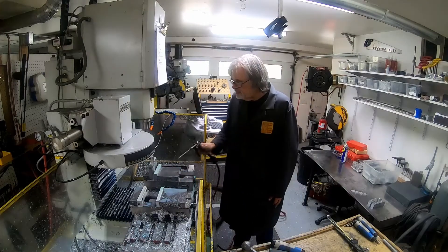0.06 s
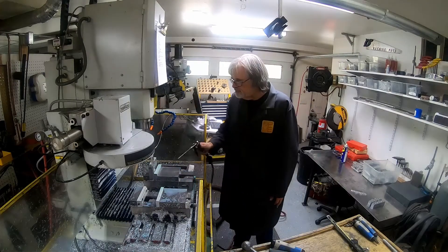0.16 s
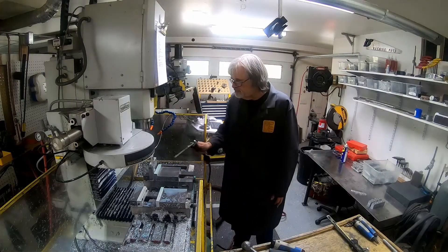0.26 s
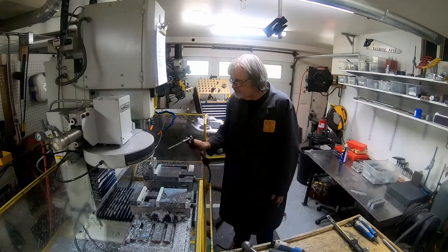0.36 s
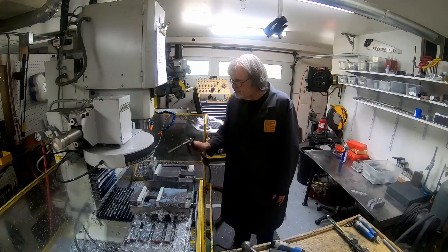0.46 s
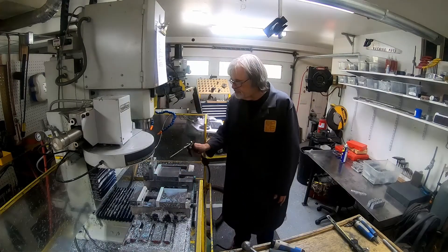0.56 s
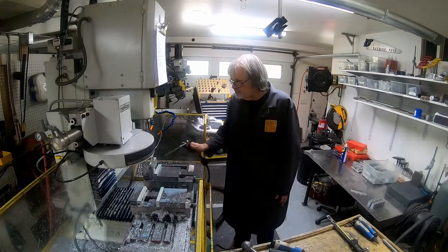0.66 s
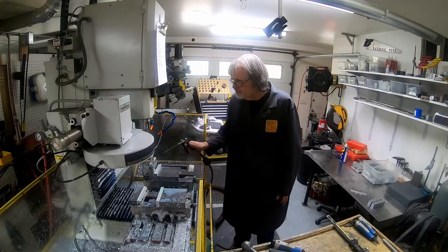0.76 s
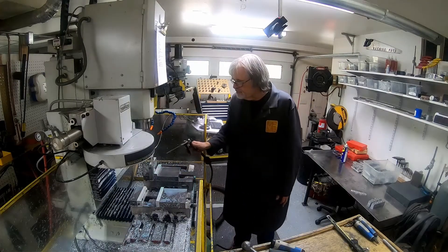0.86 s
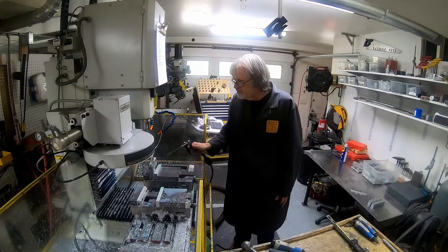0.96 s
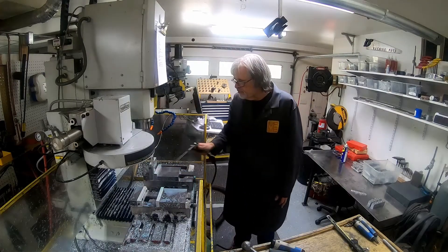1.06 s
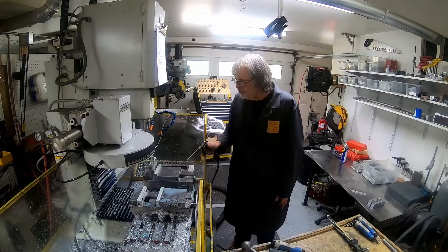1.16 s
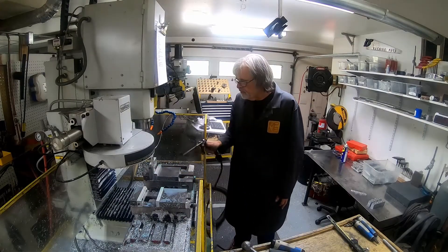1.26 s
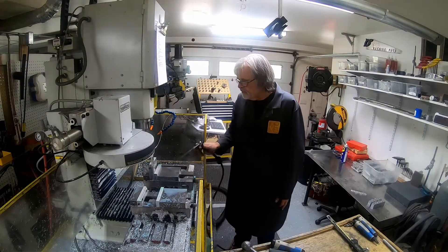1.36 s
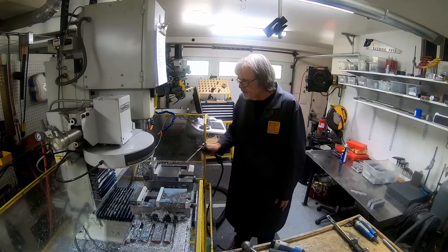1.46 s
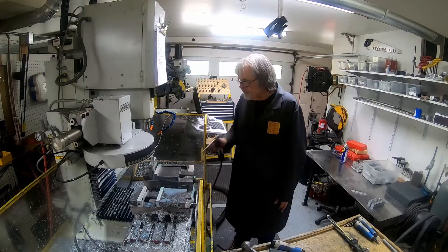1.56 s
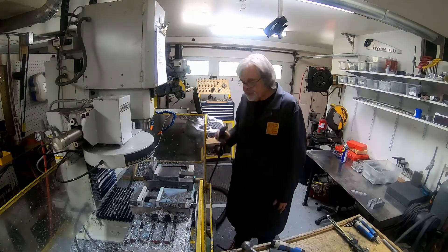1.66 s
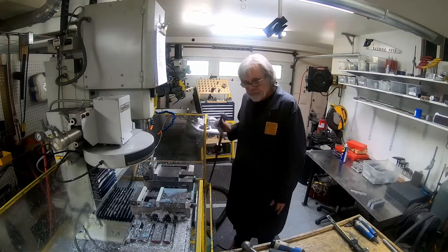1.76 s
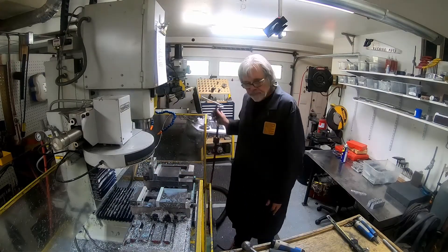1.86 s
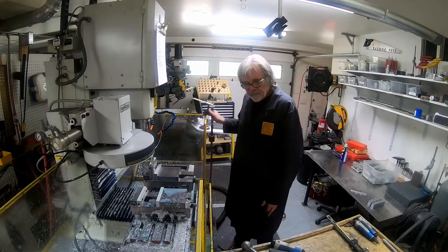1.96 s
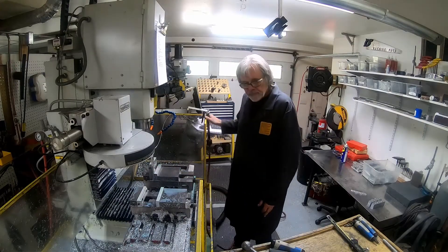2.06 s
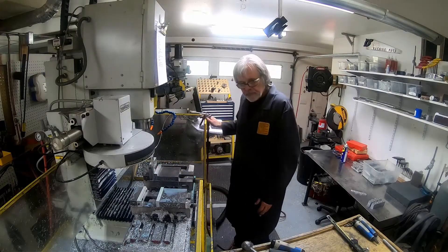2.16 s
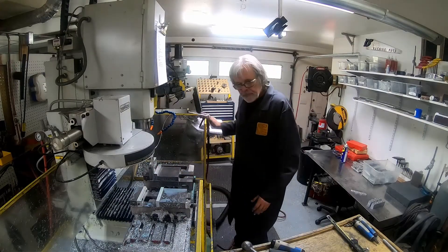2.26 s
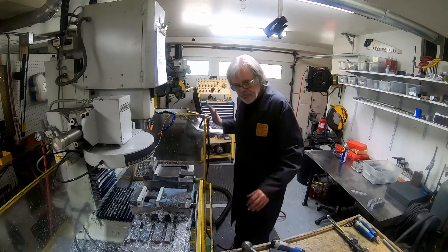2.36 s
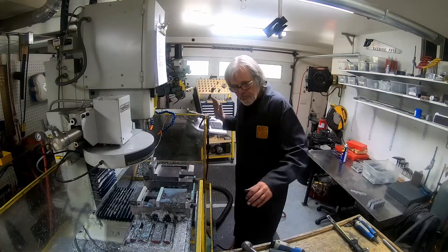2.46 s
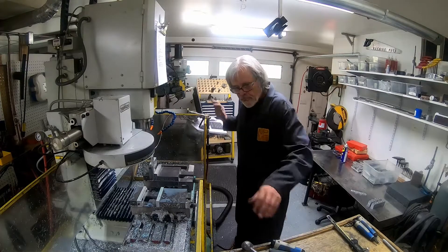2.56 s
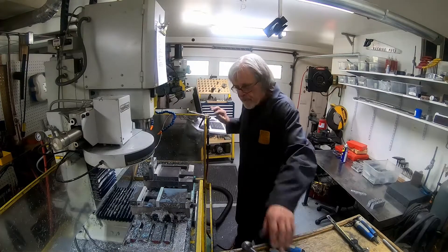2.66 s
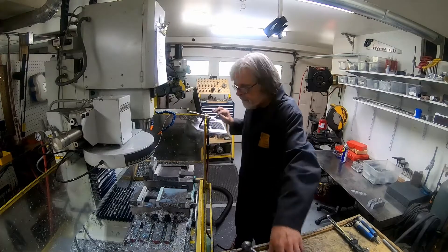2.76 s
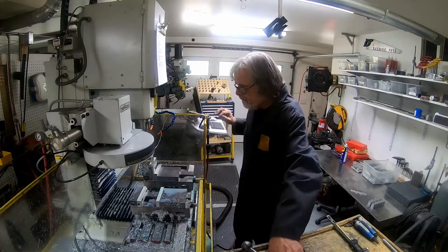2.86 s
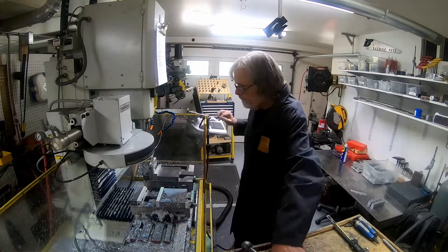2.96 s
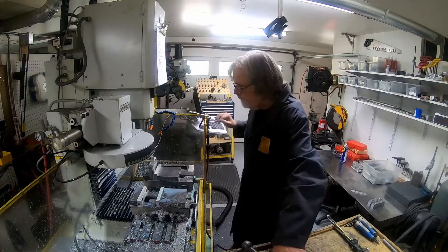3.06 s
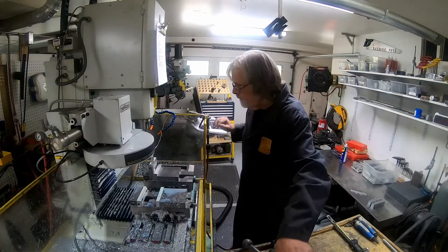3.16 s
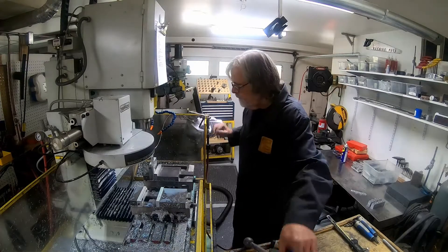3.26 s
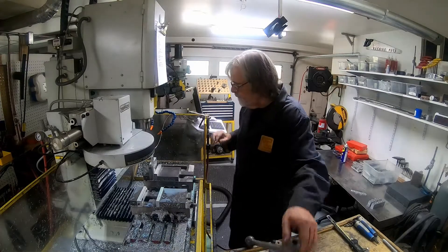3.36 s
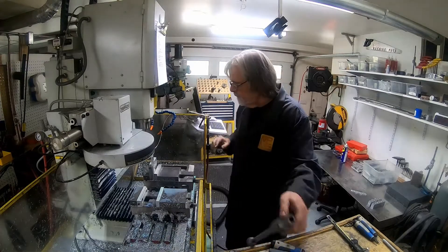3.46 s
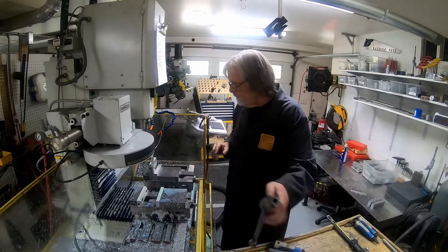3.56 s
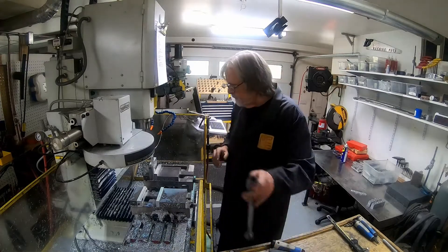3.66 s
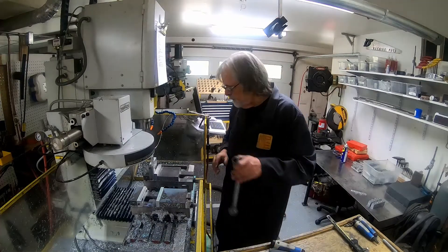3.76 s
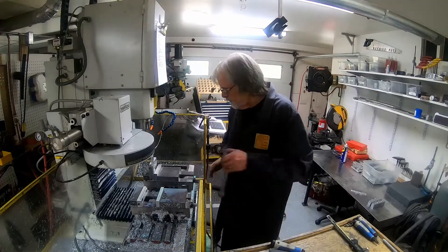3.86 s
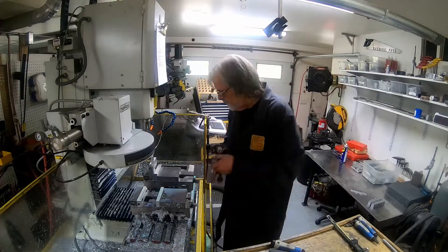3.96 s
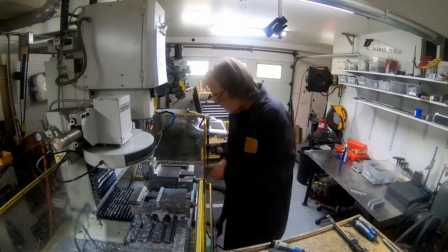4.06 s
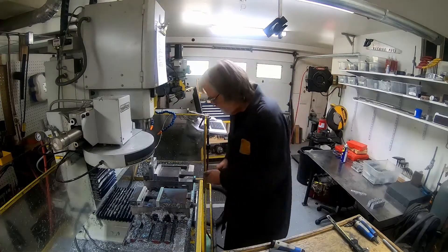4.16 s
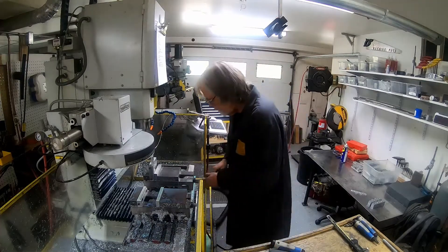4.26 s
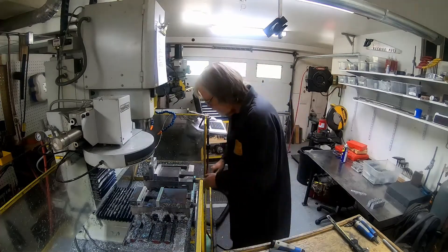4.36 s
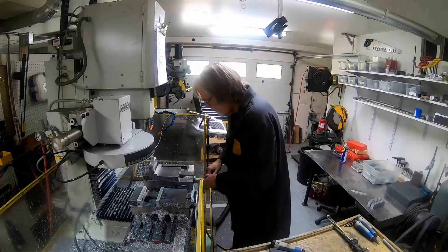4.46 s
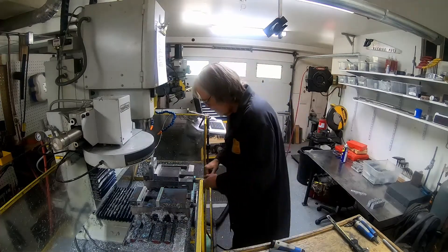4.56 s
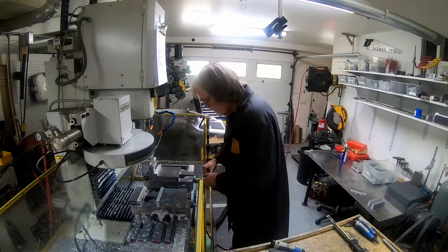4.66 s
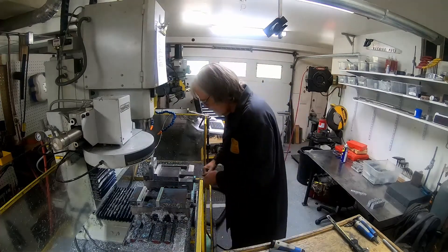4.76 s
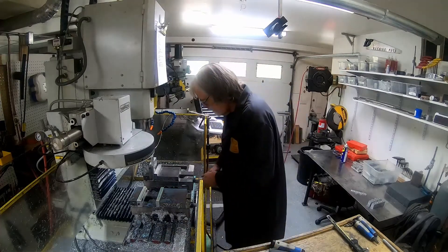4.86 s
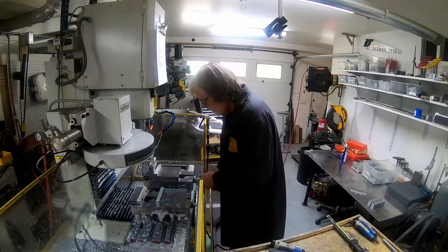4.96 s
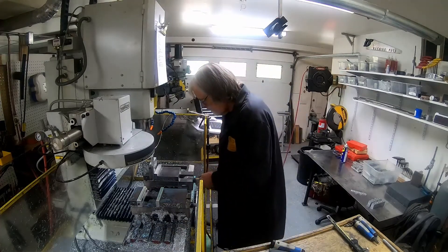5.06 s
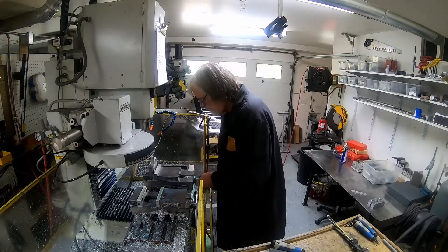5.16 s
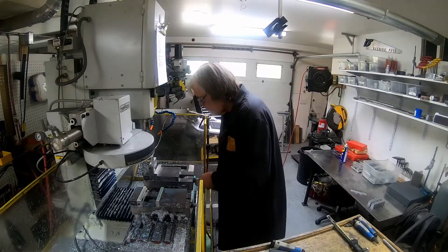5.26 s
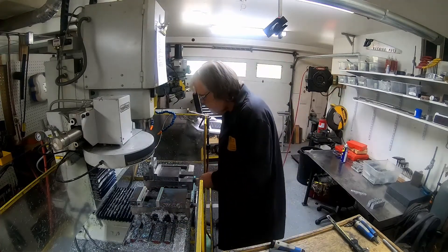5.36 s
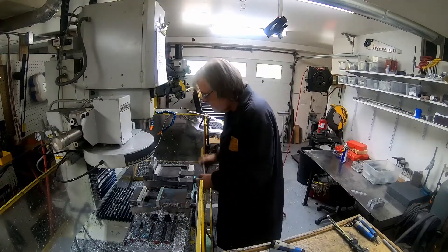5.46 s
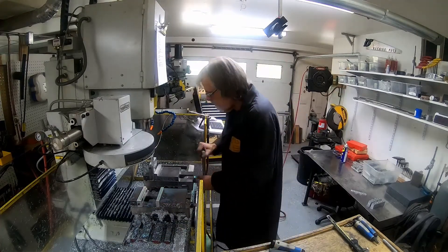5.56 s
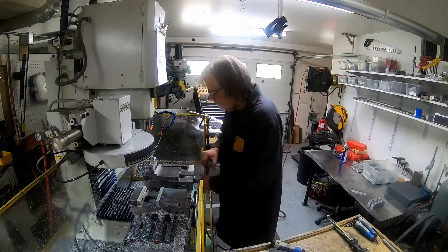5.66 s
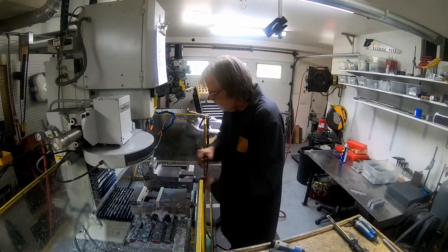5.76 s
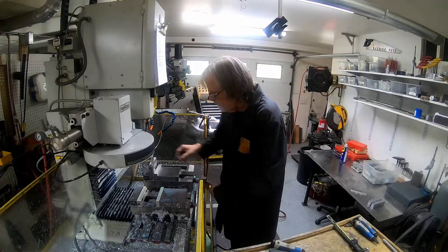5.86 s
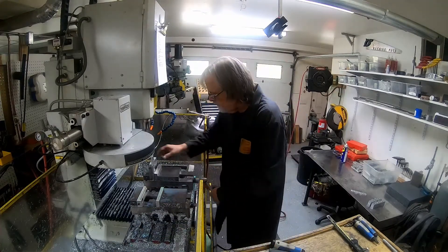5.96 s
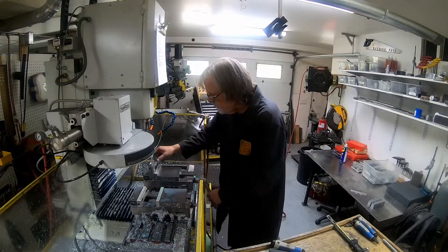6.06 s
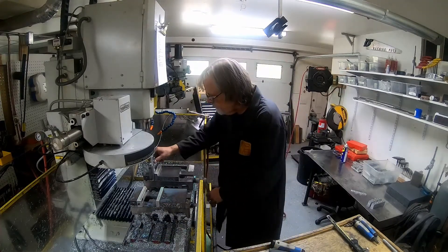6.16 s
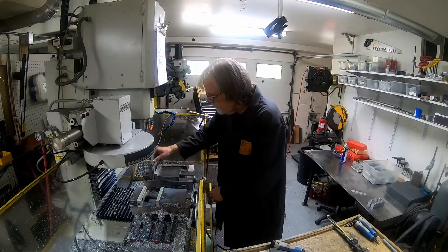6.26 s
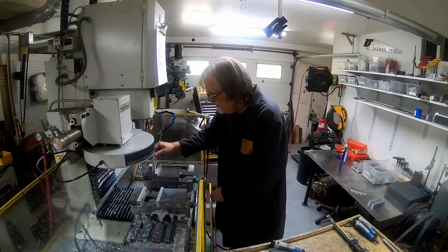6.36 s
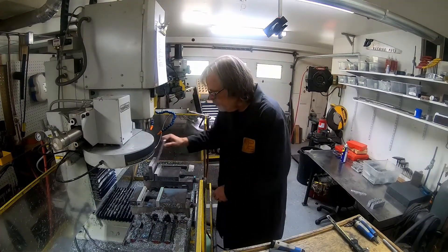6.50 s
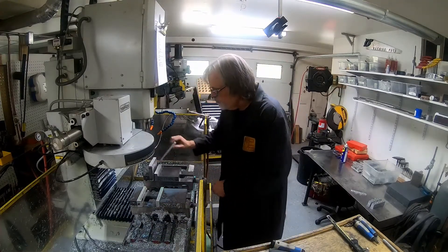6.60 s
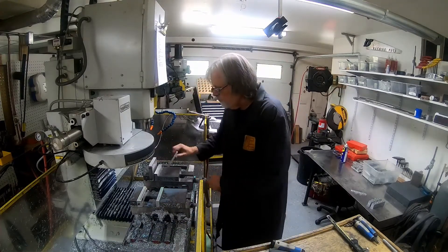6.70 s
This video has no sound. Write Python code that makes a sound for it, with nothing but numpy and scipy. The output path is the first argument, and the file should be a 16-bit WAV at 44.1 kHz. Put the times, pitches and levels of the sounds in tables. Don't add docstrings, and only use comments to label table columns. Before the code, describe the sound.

In an echoing garage workshop, an air gun spits five rapid bursts, is hung up with a thud, then wrench and vise parts click and scrape quietly.

```python
import sys
import numpy as np
from scipy import signal
from scipy.fft import rfft, irfft, next_fast_len
from scipy.io import wavfile
from scipy.ndimage import uniform_filter1d

SR = 44100
rng = np.random.default_rng(int(sys.argv[2]) if len(sys.argv) > 2 else 0)


def to_wav(sig):
    pcm = np.clip(np.atleast_2d(sig), -1, 1) * 32767
    pcm = np.round(pcm).astype(np.int16)
    wavfile.write(sys.argv[1], SR, pcm.T)


def invert_db(level):
    return 10 ** (np.asarray(level, dtype=float) / 20)


N = 296793

# (t/s, fine friction level/dB)
EFFORT = [(2.5, -83.5), (2.88, -84.5), (3.36, -79), (3.86, -84), (3.93, -89.5), (4.41, -85.5), (4.47, -69),
          (4.92, -61.5), (5.1, -62), (5.17, -73.5), (5.42, -65), (5.53, -59.5), (5.65, -71), (5.9, -86),
          (6.23, -72), (6.38, -67.5), (6.44, -56.5), (6.72, -86)]


def rms_one(x):
    return x / np.sqrt(np.mean(x ** 2) + 1e-20)


def played(tables, fade_s, out_s=None):
    t = np.arange(N) / SR
    s, *columns = np.transpose(np.concatenate(tables))
    gate = 0
    for rows in tables:
        start, end = rows[0][0], rows[-1][0]
        gate = gate + np.interp(t, [start - fade_s, start, end, end + (out_s or fade_s)], [0, 1, 1, 0])
    return [np.minimum(gate, 1)] + [np.interp(t, s, column) for column in columns]


def held(s, rise_s, length, fall_db_per_s, start_db=-18):
    t = np.arange(N) / SR - s
    rise = np.minimum(start_db * (1 - t / rise_s), 0)
    return np.where(t < 0, -200, rise - fall_db_per_s * np.maximum(t - length, 0))


def at_hz(points, hz):
    points = np.array(points)
    return np.interp(np.log(hz), np.log(points[:, 0]), points[:, 1])


def drift(rate):
    knots = rng.standard_normal(N // 64 + 400)
    r = np.exp(-128 * np.pi * rate / SR)
    slow = signal.lfilter([1], [1, -2 * r, r * r], knots)[398:]
    return np.interp(np.arange(N) / 64, np.arange(len(slow)), rms_one(slow))


def bands(low_hz, high_hz, count=2):
    edges = np.geomspace(low_hz, high_hz, int(count * np.log2(high_hz / low_hz)) + 2)
    return [(np.sqrt(a * b), signal.butter(2, [a, b], "band", fs=SR, output="sos"))
            for a, b in zip(edges, edges[1:])]


def coloured(spectrum, patchy_db, rate, grain_db=0.):
    grain = invert_db(grain_db * np.minimum(rng.exponential(1, N), 5))
    white = rng.standard_normal((2, N)) * grain
    together = drift(rate / 2)
    out = np.zeros(N)
    for k, (hz, sos) in enumerate(bands(spectrum[0][0], spectrum[-1][0])):
        flicker_db = patchy_db * (0.65 * together + drift(rate))
        out += invert_db(at_hz(spectrum, hz) + flicker_db) * signal.sosfilt(sos, white[k % 2])
    return rms_one(out)


def resonance(x, hz, width_hz):
    r = np.exp(-np.pi * width_hz / SR)
    poles = [1, -2 * r * np.cos(2 * np.pi * hz / SR), r * r]
    return signal.lfilter([(1 - r * r) / 2, 0, (r * r - 1) / 2], poles, x)


def twice(x, hz, width_hz):
    return resonance(resonance(x, hz, width_hz), hz, width_hz)


def moving_band(hz, width_hz, even=0.):
    lowpass = signal.butter(2, width_hz / 2, fs=SR, output="sos")
    slow = signal.sosfilt(lowpass, rng.standard_normal((2, len(hz))))
    slow = rms_one(slow) / (np.hypot(*rms_one(slow)) + .2) ** even
    phase = 2 * np.pi * np.cumsum(hz) / SR
    return rms_one(slow[0] * np.cos(phase) + slow[1] * np.sin(phase))


def add(track, s, sound):
    i = round(s * SR)
    track[i:i + len(sound)] += sound[:N - i]


def background():
    # (f/Hz, level/dB per Hz)
    hum = [(13, -27), (22, 2), (49, -3.5), (124, -4.5), (146, -17.5), (227, -7.5), (275, -19.5), (420, -19),
           (1500, -37.5), (1950, -68.5), (3300, -120)]
    # (f/Hz, level/dB per Hz)
    thin_air = [(530, -34.5), (900, -8), (1190, -10.5), (2630, -9.5), (13300, -18.5), (14500, -12),
                (16000, -25)]
    # (f/Hz, width/Hz, level/dB)
    whines = [(7987, 130, -93), (14450, 25, -100), (14879, 40, -104)]
    # (t/s, length/s, then the rise/dB of each whine)
    swells = [(2.2, .2, 5.5, 12, 3), (2.4, 0.22, 3.6, 2, 3), (5.05, .1, 6, 0, 0), (6.56, .2, 5, 7, 0),
              (2.9, .9, 2, 0, 0)]
    _, effort_db = played([EFFORT], fade_s=.01)
    rumble = invert_db(-58.5 + 0.22 * (effort_db + 70)) * coloured(hum, patchy_db=2.0, rate=17.0)
    whine = np.zeros(N)
    for k, (hz, width_hz, db) in enumerate(whines):
        level = invert_db(db)
        for s, length, *rises_db in swells:
            level = level + (invert_db(db + rises_db[k]) - invert_db(db)) * invert_db(held(s, .03, length, 100))
        whine += level * moving_band(np.full(N, hz), width_hz)
    return rumble + invert_db(-81.5) * coloured(thin_air, patchy_db=-1.0, rate=7.3) + whine


def blow_gun():
    # (pulled t/s, let go t/s, hiss level/dB, sag while held/dB, low roar level/dB)
    blasts = [(-.05, 0.063, -27.5, 0, 0), (0.275, 0.416, -28, -0.5, 0), (0.655, 0.813, -26, 3.5, -2),
              (1.034, 1.214, -27, 5, -1), (1.432, 1.593, -25, 3.5, 0.5)]
    # (t/s, level/dB)
    aim = [(0, 3), (.06, -1.5), (.3, -3), (.39, 0), (.48, -1.5), (.68, 1), (.72, -1), (.8, -2.5), (1.05, 2),
           (1.09, 1), (1.13, -1), (1.2, -2), (1.45, -3.5), (1.51, -5.5), (1.565, -0.5), (1.65, -1)]
    # (f/Hz, level/dB per Hz)
    hiss_colour = [(4200, -4.5), (5500, -1.5), (7000, -1.5), (8500, -3), (10200, -5), (12000, -8)]
    sizzle_colour = [(9300, -5), (10800, -1), (12500, 3), (14200, 0), (16600, -7)]
    roar_colour = [(15, -28.5), (25, -2.5), (198, -4), (525, -4.5), (678, -3.5), (757, -1), (961, -1.5),
                   (2000, -10), (2600, -44), (4400, -120)]
    rush_colour = [(1250, -3), (1600, -4.5), (2200, -0.5), (3000, 1), (4300, 2)]
    shut_s = .06
    t, flow, open_s, roar_db = np.arange(N) / SR, 0, 0, 0
    for opens, shuts, db, sag_db, low_db in blasts:
        length = shuts - opens
        since = np.clip(t - opens, 0, length)
        closed = np.interp(t, [shuts + shut_s, shuts + shut_s + .03], [1, 0])
        valve_db = held(opens, 0.03, length, 329.5, start_db=-21)
        flow = flow + closed * invert_db(db - sag_db * since / length + valve_db)
        open_s = np.where(t >= opens, since, open_s)
        roar_db = np.where(t >= opens, low_db, roar_db)
    _, aim_db = played([aim], fade_s=.01)
    hiss = coloured(hiss_colour, patchy_db=1.58, rate=19)
    sizzle = invert_db(-6.5 + 19.5 * open_s) * coloured(sizzle_colour, patchy_db=1.0, rate=49)
    roar = invert_db(-6 + roar_db + aim_db) * coloured(roar_colour, patchy_db=-2.5, rate=14)
    rush = invert_db(-2.5 + 1.7 * aim_db) * coloured(rush_colour, patchy_db=0.86, rate=20.0)
    return flow * invert_db(0.8 * drift(60)) * (hiss + sizzle + roar + rush)


def pockets():
    # (t/s, length/s, from f/Hz, to f/Hz, level/dB)
    passes = [(0, 0.038, 620, 653.2, -32.5), (0.018, 0.055, 2900, 3500, -26),
              (0.282, 0.04607, 6450, 5700, -32), (0.305, 0.1, 760, 900, -36),
              (0.376, 0.05, 3940, 3000, -37), (0.672, 0.03815, 7700, 6680, -26.5),
              (0.686, 0.097, 3580, 3700, -42), (1.065, 0.052, 4800, 4563, -26.5),
              (1.104, 0.03, 3700, 3400, -29), (1.126, .022, 2700, 2550, -29), (1.075, .03, 2400, 2200, -33),
              (1.45, .07, 11800, 12300, -35), (.07, .22, 3100, 3000, -51), (.07, .2, 560, 540, -54),
              (0, .07, 2200, 2300, -36), (.7, .1, 6200, 5900, -34), (1.65, .25, 560, 540, -61),
              (1.44, 0.07, 4300, 4100, -32.5), (1.542, 0.052, 2400, 2550, -27),
              (1.57, .045, 900, 600, -38.5), (1.036, .04, 1250, 1500, -38.5),
              (1.05, 0.087, 6200, 5800, -33), (.7, 0.083, 1150, 1200, -37), (0, .07, 6700, 8300, -34),
              (0, .065, 5900, 5700, -33), (.3, 0.09, 12500, 13000, -38), (.69, .1, 12800, 12500, -37),
              (1.46, .12, 8500, 8800, -34), (.28, .13, 7500, 7000, -36), (.755, 0.038, 4900, 5400, -36),
              (.75, .04, 3500, 3600, -36.5), (.33, .05, 6500, 5400, -35), (1.5, 0.069, 5700, 5000, -36),
              (0, 0.056, 197.6, 180, -38.5)]
    out = np.zeros(N)
    for s, length, from_hz, to_hz, db in passes:
        hz = np.linspace(from_hz, to_hz, round(length * SR))
        whistle = moving_band(hz, width_hz=0.21 * from_hz, even=.3)
        add(out, s, invert_db(db) * np.hanning(len(hz)) ** 0.45 * whistle)
    return out * invert_db(0.92 * drift(80))


def shop(x, tail_share):
    # (f/Hz, t60/s)
    room_t60 = [(60, 1.8), (250, 1.1), (1000, 1.13), (4000, 1.06), (9000, 0.69), (12500, 0.52),
                (15500, 0.36)]
    t = np.arange(SR * 3 // 2) / SR
    white = rng.standard_normal((2, len(t)))
    late_db = 70 * np.maximum(t - 0.28, 0)
    echo = np.zeros(len(t))
    for k, (hz, sos) in enumerate(bands(40, 17000, count=4)):
        decay_db = -60 * t / at_hz(room_t60, hz) / tail_share - min(hz / 2002, 1) * late_db
        echo += signal.sosfilt(sos, white[k % 2]) * invert_db(decay_db)
    echo = echo * (1 - np.exp(-t / 0.006))
    return signal.fftconvolve(x, echo / np.sqrt(np.sum(echo ** 2)))[:N]


def knocks():
    # (t/s, peak level/dB, f/Hz, burst/ms, brightness/dB)
    tool_knocks = [(1.925, -47, 493.5, 23, -10), (2.041, -60.5, 150.1, 26, -26.5),
                   (2.848, -58, 694.8, 30, -9), (2.863, -57, 650, 39, -4.5),
                   (2.917, -51, 420, 16.16, -20.5), (2.976, -52, 390, 9.8, -26.5),
                   (3.005, -43.5, 390, 16, -28), (3.029, -45.5, 348, 4.656, -17),
                   (3.008, -52, 1000, 14, -14), (2.179, -42, 700, 8, -22), (2.327, -40, 1700, 25, -12),
                   (4.447, -42.5, 407, 57, -10), (4.68, -39, 760, 14, -12), (4.697, -43, 790, 14, -8),
                   (4.938, -45, 305, 4.1, -20.5), (5.679, -49.5, 488, 25, -19), (5.833, -55, 255, 12, -26),
                   (6.496, -28, 845, 16.5, -10)]
    more_knocks = [(2.157, -49, 600, 8, -26), (2.213, -38, 600, 6, -20), (2.326, -33.5, 1390, 34.5, -32),
                   (2.356, -31, 343, 5.699, -35), (5.035, -33, 1130, 12.3, -1), (5.84, -55, 945, 9.3, -15),
                   (5.551, -43, 445, 8.3, -19.5), (6.4973, -18, 710, 0.91, -4), (6.499, -26, 587, 6, -30),
                   (6.501, -41, 128.4, 22, -41)]
    out, t = np.zeros(N), np.arange(SR // 5) / SR
    for s, db, hz, burst_ms, bright_db in tool_knocks + more_knocks:
        decay = np.exp(-1000 * t / max(burst_ms, 1))
        burst = rng.standard_normal(len(t)) * decay * (1 - np.exp(-t / 0.0037))
        burst[40] += 5.0
        body = twice(burst, hz, 1.08 * hz)
        edge = twice(burst, 2200, 2400)
        knock = body / np.abs(body).max() + invert_db(bright_db) * edge / np.abs(edge).max()
        add(out, s, invert_db(db) * knock)
    return signal.sosfilt(signal.butter(2, 6000, fs=SR, output="sos"), out)


def pushes():
    # (t/s, peak level/dB, f/Hz, t60/s)
    panel_pushes = [(2.179, -28.5, 448, 0.055), (2.196, -35, 328, 0.072), (2.212, -30.5, 202, 0.087),
                    (2.234, -32, 214, 0.16), (2.252, -36, 201, .12), (2.277, -41, 244, 0.085),
                    (2.299, -46, 193, 0.094), (2.332, -27, 240, 0.037), (2.327, -32, 620, 0.061),
                    (2.345, -33, 480, 0.044), (2.373, -33, 298, 0.056), (2.392, -32.5, 192, 0.068),
                    (2.408, -34, 230, 0.036), (2.431, -46, 180, 0.049), (5.019, -42, 557, 0.087),
                    (5.036, -34, 490, 0.07), (5.075, -33.5, 602, 0.037), (5.088, -40, 329, 0.089),
                    (5.111, -39, 600, 0.038), (5.172, -55, 300, .08), (2.1545, -25.5, 71.7, .1),
                    (3.108, -54, 401, 0.073), (3.355, -51, 60, 0.24), (3.632, -53, 90, 0.14),
                    (3.79, -47, 100, .15), (5.683, -53, 480, .15), (5.504, -35.5, 330, 0.076),
                    (5.518, -37.5, 280, .08), (5.563, -37, 450, 0.057), (2.3346, -26, 340, .03),
                    (2.3565, -26, 330, 0.033), (6.4, -51, 1490, .08), (6.424, -50, 2350, .08),
                    (6.5, -33.5, 311, 0.086), (6.405, -50, 230, .1), (6.435, -48, 260, .1),
                    (3.01, -52, 210, .08), (2.921, -53, 428, .06), (3.007, -47, 395, 0.074),
                    (3.03, -52, 603, 0.025), (5.836, -56, 950, .05), (2.2135, -36, 620, .04),
                    (2.203, -38, 120, .05), (6.505, -35.5, 812, 0.11), (6.52, -48, 700, 0.083)]
    out, t = np.zeros(N), np.arange(SR // 5) / SR
    for s, db, hz, t60 in panel_pushes:
        partner_db = -6 - 4.0 * hz / 1000
        pair = np.sin(2 * np.pi * hz * t) + invert_db(partner_db) * np.sin(2 * np.pi * 1.37 * hz * t)
        rise = 1 - np.exp(-t * hz / 0.58)
        add(out, s, invert_db(db - 60 * t / t60) * rise * pair)
    return out


def rustle():
    return invert_db(-78 + held(2.155, .01, .24, 150)) * twice(rng.standard_normal(N), 11000, 12000)


def shaken(contacts, modes):
    out = np.zeros(N)
    for k, (hz, width_hz, db) in enumerate(modes):
        out += (-1) ** k * invert_db(db) * rms_one(twice(contacts, hz, 2.0 * width_hz))
    return rms_one(out)


def bumps():
    # (t/s, boom held/s, boom level/dB, panels and clatter/dB rel. boom)
    hits = [(2.168, 0.034, -46.5, 7.5, -8), (2.212, 0.095, -43.5, -2, -17), (2.322, 0.067, -41, 5, -18),
            (2.425, 0.078, -57.5, 0, -7.5), (5.07, 0.037, -48.5, 4.5, -4.5), (5.1, 0.021, -69, -1.5, -4),
            (5.495, 0.04, -43.5, 1, -7), (5.551, 0.01, -49.5, 8, -10)]
    # (f/Hz, width/Hz, level/dB)
    cabinet_modes = [(57.019, 35.587, -3), (103, 102, 0.5), (226, 24, 3.5), (276.07, 220, -20)]
    panel_modes = [(386, 67, 7), (533, 150, 9.5), (620, 316, 4), (838, 60, -0.5), (1166.4, 79, -36.5),
                   (1460, 50, -28.5)]
    boom = panel = hard = 0
    for s, length, db, panel_db, clatter_db in hits:
        contact = invert_db(db + held(s, 0.0048, length, 495))
        since = np.maximum(np.arange(N) / SR - s, 0)
        boom = boom + contact
        panel = panel + contact * invert_db(panel_db - 115 * since)
        hard = hard + contact * invert_db(clatter_db - 136 * since)
    contacts = (rng.random(N) < 1100 / SR) * rng.standard_normal(N) + 1e-9
    clatter_colour = [(900, 12.5), (2500, 3.5), (5000, -6), (8000, -9.5), (16000, -34)]   # (f/Hz, dB per Hz)
    clatter = coloured(clatter_colour, patchy_db=1.0, rate=38, grain_db=0.5)
    return boom * shaken(contacts, cabinet_modes) + panel * shaken(contacts, panel_modes) + hard * clatter


def sliding():
    # (f/Hz, level/dB per Hz)
    fine_colour = [(2600, -5.5), (3500, 5), (5000, -4.5), (7000, -1.5), (8600, -0.5), (10500, -7),
                   (13000, -7.5), (16200, -14.5)]
    coarse_colour = [(200, 7), (420, 7.5), (700, 5.5), (1200, -2.5), (2100, 0.5), (3200, -12.5)]
    # (t/s, length/s, level/dB)
    drags = [(3.26, 0.58, -75), (4.758, 0.1766, -64.5), (5.218, 0.417, -60), (6.215, .13, -76),
             (6.015, 0.39, -77.5)]
    # (f/Hz, width/Hz, level/dB)
    drag_modes = [(420, 130, 9.5), (1790, 200, 3), (2100, 900, -1), (2380, 140, 2), (3700, 200, -8),
                  (11507, 6500, -5)]
    pressed_modes = [(6950, 700, -14), (9500, 700, -17)]
    gate, effort_db = played([EFFORT], fade_s=0.1)
    fine = invert_db(effort_db) * coloured(fine_colour, patchy_db=-1.0, rate=20.82, grain_db=-3.5)
    coarse_db = -64 + 0.91 * (effort_db + 69)
    coarse = invert_db(coarse_db) * coloured(coarse_colour, patchy_db=2.0, rate=52.0, grain_db=2.5)
    drag = sum(invert_db(db + held(s, 0.043, length, 190)) for s, length, db in drags)
    drag = drag * invert_db(2 * drift(14.1))
    grit = rng.standard_normal(N)
    sung = np.zeros(N)
    for hz, width_hz, db in drag_modes:
        sung += invert_db(db + 2.4 * drift(9.6)) * rms_one(twice(grit, hz, width_hz))
    pressed = sum(invert_db(db) * rms_one(resonance(grit, hz, w)) for hz, w, db in pressed_modes)
    pressure = np.minimum(drag / invert_db(-62), 1) ** 2
    return gate * (fine + coarse) + drag * (rms_one(sung) + pressure * pressed)


def clicks():
    # (t/s, peak level/dB, crack/dB rel. ring, t60/s, loudest f/Hz)
    touches = [(3.029, -58, -8, 0.04, 2700), (3.244, -63, -3.5, 0.05734, 1930),
               (3.2974, -73, -10.0, 0.045, 4150), (4.1835, -51, -10, 0.029, 4700),
               (4.4448, -43, -12.5, 0.14, 2170), (4.4625, -41, -11, 0.049, 3960),
               (4.455, -49, -8, .05, 4250), (4.4715, -47, -9, 0.027, 4300), (4.703, -52, -4, .05, 2400),
               (4.5039, -43.5, -14, 0.058, 4000), (4.687, -45, -6, 0.1166, 2608),
               (5.033, -35.5, 7.5, 0.04, 2152), (5.0328, -32, -25.5, 0.056, 8150),
               (5.105, -41, 1, 0.027, 2509), (5.111, -44, -9, 0.059, 2600), (5.495, -40, -5, 0.072, 1810),
               (5.5505, -42.5, -10.5, 0.11, 2290), (5.6726, -54, -4, 0.11, 2168),
               (5.834, -62.5, -4.0, 0.05, 1753), (5.838, -64, -16, 0.041, 4300),
               (6.3548, -60, -7, 0.055, 4970), (6.3952, -49, -9, 0.3, 2313), (6.417, -52, -8, 0.1298, 8900),
               (6.424, -50, -6, 0.05, 6900), (6.449, -37, 3, 0.04, 4250), (6.449, -37, -2, 0.019, 8990),
               (6.4979, -38, -10, 0.13, 4410)]
    # (f/Hz, width/Hz, level/dB)
    wrench_modes = [(1760, 110, 2.5), (2400, 410, 8), (2875.8, 230, -5), (4230, 320, 4), (5288.2, 300, -21),
                    (6900, 300, -4), (8440, 450, -1), (9550, 230, -28.5), (13090, 700, -3)]
    spread_hz = 1400
    out, t = np.zeros(N), np.arange(SR // 5) / SR
    for s, db, crack_db, t60, top_hz in touches:
        touch = rng.standard_normal(len(t)) * invert_db(-60 * t / t60)
        ring = np.zeros(len(t))
        for hz, width_hz, mode_db in wrench_modes:
            near_db = -6 * ((hz - top_hz) / spread_hz) ** 2
            overtone_db = -10.5 - 6 * ((hz - 2 * top_hz) / spread_hz) ** 2
            driven = twice(touch, hz, 2.0 * width_hz) / np.sqrt(width_hz)
            ring += invert_db(mode_db + max(near_db, overtone_db)) * driven
        crack = twice(touch, top_hz, 7500)
        click = ring / np.abs(ring).max() + invert_db(crack_db) * crack / np.abs(crack).max()
        add(out, s, invert_db(db) * click)
    return out


def rings():
    # (t/s, peak level/dB, f/Hz, t60/s)
    taps = [(4.183, -50, 4330, .05), (4.184, -67, 8500, .05), (5.034, -55, 7980, .25),
            (5.034, -58, 8450, .12), (5.034, -57, 5450, .13), (5.034, -55, 6900, .07),
            (5.034, -58, 3700, .12), (5.036, -53, 2400, .15), (4.452, -64, 8400, .06),
            (4.464, -62, 8450, .06), (4.504, -66, 8400, .05), (6.353, -64, 5050, .08),
            (6.396, -60, 4250, .08), (6.416, -58, 8750, .1), (6.43, -60, 9000, .1),
            (6.449, -54, 12000, .08), (5.553, -58, 2340, .25), (5.836, -66, 4400, .05)]
    out, t = np.zeros(N), np.arange(SR // 4) / SR
    for s, db, hz, t60 in taps:
        pair = np.sin(2 * np.pi * hz * t) + invert_db(-4) * np.sin(2 * np.pi * 1.012 * hz * t)
        add(out, s, invert_db(db - 60 * t / t60) * (1 - np.exp(-t / .001)) * pair)
    return out


def squeals():
    # (t/s, f/Hz, level/dB)
    squeaks = [
        [(4.44, 8867, -83), (4.5, 11310, -79), (4.58, 13490, -82), (4.67, 15880, -78.5)],
        [(5.99, 12600, -92.5), (6.02, 13560, -90), (6.07, 15400, -89)],
        [(6.357, 15500, -84), (6.38, 11500, -84)],
    ]
    # (t/s, level/dB, f/Hz)
    scrape = [(6.45, -38, 4494), (6.46, -50, 4610), (6.47, -36.5, 4550), (6.476, -46, 4570),
              (6.481, -34.5, 4600), (6.487, -49, 4535), (6.495, -42, 4470), (6.515, -51, 4380),
              (6.56, -66, 4450)]
    # (multiple of the pitch, width/Hz, level/dB)
    scrape_modes = [(.55, 925, -6.5), (.76, 300, -15), (1.001, 260, 1.5), (1.25, 2400, -7), (2.02, 480, -8),
                    (2.63, 480, -16)]
    gate, hz, db = played(squeaks, fade_s=0.01584)
    squeaked = gate * invert_db(db) * moving_band(hz, 120)
    gate, db, hz = played([scrape], fade_s=0.00084, out_s=0.011)
    modes = sum(invert_db(mode_db) * moving_band(k * hz, w, even=.5) for k, w, mode_db in scrape_modes)
    return squeaked + gate * invert_db(db + .6 * drift(69.5)) * modes


def difference(mid):
    # (f/Hz, level/dB)
    side_colour = [(40, 6.5), (300, 2), (1000, 5), (2500, -7.5), (5000, 1.5), (10000, 7), (16000, 9)]
    late, blocks = np.roll(mid, 300), N // 1024 + 1
    mood = rng.standard_normal(blocks // 2 + 1).repeat(2)[:blocks]
    out = invert_db(-93) * twice(rng.standard_normal(N), 11000, 14000)
    for hz, sos in bands(60, 15800):
        apart = mood + .7 * rng.standard_normal(blocks) > 1.2
        gate = uniform_filter1d(apart.repeat(1024)[:N] * 1., size=500)
        out = out + invert_db(-14.5 + at_hz(side_colour, hz)) * gate * signal.sosfilt(sos, late)
    return out


def scene():
    jet, whistles = blow_gun(), pockets()
    dull = knocks() + pushes() + bumps()
    steel = clicks() + rings()
    wet = invert_db(-14.5) * shop(jet + invert_db(-12) * whistles, tail_share=1.0)
    wet = wet + invert_db(-14) * shop(dull + invert_db(-9) * steel, tail_share=0.26)
    mid = background() + jet + whistles + dull + steel + wet + rustle() + sliding() + squeals()
    side = difference(mid)
    return np.array([mid + side, mid - side])


def low_pass(x):
    return signal.sosfilt(signal.butter(12, 15913, fs=SR, output="sos"), x)


def record(dry):
    limit, cutoff_hz = .36, 15830
    size = next_fast_len(N + SR // 4)
    edge = np.clip((cutoff_hz - np.fft.rfftfreq(size, 1 / SR)) / 200, 0, 1)
    rounded = limit * np.tanh(dry / limit)
    cut = irfft(rfft(rounded, size) * edge, size)[:, :N]
    return low_pass(cut)


dry = scene()
out = record(dry)
to_wav(out)
```